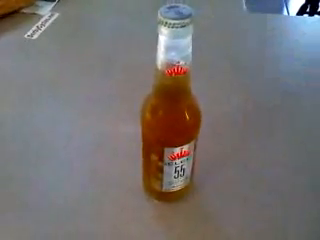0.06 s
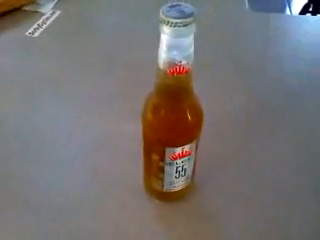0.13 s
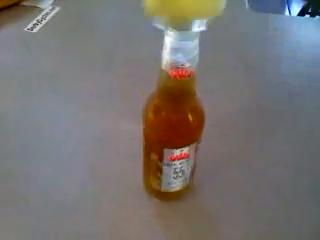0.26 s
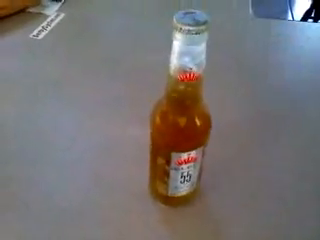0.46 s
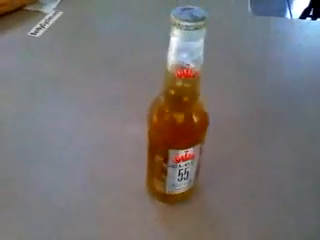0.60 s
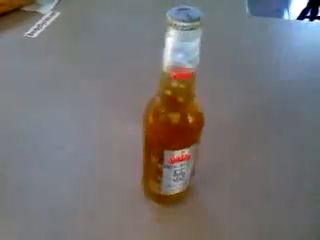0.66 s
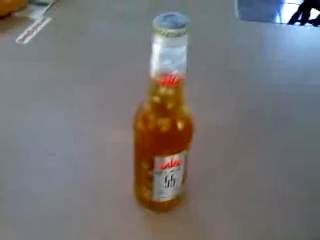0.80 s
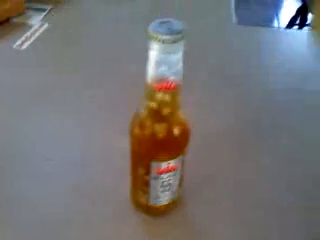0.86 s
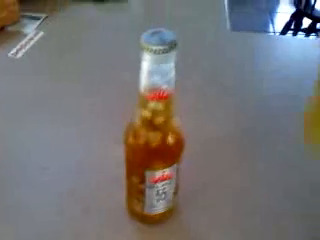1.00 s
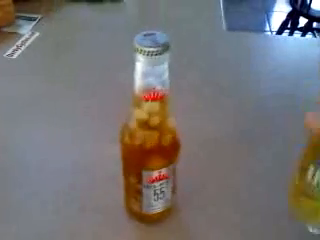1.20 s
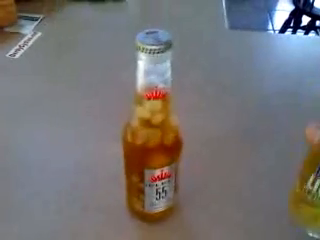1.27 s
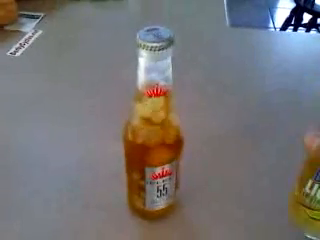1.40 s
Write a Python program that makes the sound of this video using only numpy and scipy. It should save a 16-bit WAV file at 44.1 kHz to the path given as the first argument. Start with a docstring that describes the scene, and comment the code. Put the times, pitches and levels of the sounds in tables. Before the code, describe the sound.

One sharp, rattling knock of glass bottle on bottle, ringing away in a bare room.

```python
"""A bare, echoing room: one glass bottle is knocked on the mouth of a full one standing on a table.
The glass clinks, chatters against the table and rings in its modes. Bubbles torn open in the drink
collapse in a short rattle of damped pings. The room rings on over a faint hum and hiss.
A narrow-band recorder clips the highest peaks; a few sharp ticks reach above its band."""
import sys
import numpy as np
from scipy import signal
from scipy.fft import rfft, irfft
from scipy.io import wavfile
from scipy.ndimage import uniform_filter1d

SR = 44100
rng = np.random.default_rng(int(sys.argv[2]) if len(sys.argv) > 2 else 0)


def unload_wav(signal):
    """Save mono or channel-first audio to the path in sys.argv[1] as 16-bit WAV at rate SR, clipped to [-1, 1]."""
    wavfile.write(
        sys.argv[1],
        SR,
        np.round(np.clip(np.atleast_2d(signal).T, -1, 1) * 32767).astype(np.int16),
    )


N = 63945
TIME_S = np.arange(N) / SR
BINS_HZ = np.fft.rfftfreq(N, 1 / SR)

# Room hum. Each row: centre in Hz, half-width in Hz, level in dB.
HUM_BANDS = [(325, 11, -78), (410, 10, -86)]
# Background noise spectrum. Each row: frequency in Hz, relative level in dB.
FLOOR_SPECTRUM = [(30, -19.5), (120, -13.5), (220, -7), (290, 1), (480, -1.5), (900, -6), (2000, -3),
                  (2800, -3.5), (3400, -1), (3900, -19), (4400, -32)]
# Reverb decay curve, read at band centres. Each row: frequency in Hz, T60 in seconds.
TAIL_DECAY = [(60, 0.58), (160, -0.09), (300, 0.72), (460, 0.53), (780, 0.63), (1200, 0.9051),
              (1900, 0.793), (3000, 0.58), (4200, 0.6753)]
# Reverb colour. Each row: frequency in Hz, relative gain in dB.
TAIL_SPECTRUM = [(60, -3.5), (250, 0), (480, -1), (780, 2.5), (1100, 1), (1800, 0), (2600, 0), (3400, -0.5),
                 (4200, -8)]
# Far-wall echo colour. Each row: frequency in Hz, gain in dB.
ECHO_SPECTRUM = [(100, -14.5), (600, -14), (1080, 0), (1400, -14), (2300, -16), (2900, -20), (3550, -4.5),
                 (4200, -7.5)]
# Bright ticks. Each row: start in seconds, level before filtering in dB.
PEAK_TICKS = [(.2279, -3), (0.2303, -11), (0.2824, -5.5), (0.2952, -36.5)]
# Bubble collapses. Each row: start in seconds, relative level in dB, pitch in Hz.
BUBBLES = [(.2822, -8, 1950), (.2865, -5.5, 1850), (.2915, -6.5, 1800), (.2965, -6.5, 1689),
           (.3025, -5, 1750), (.3065, -9.5, 1700), (.3160, -6.5, 1750), (.3215, -3, 2199),
           (.3275, -3, 1537), (.3413, -9, 1114)]
# Bottle modes. Each row: frequency in Hz, relative level in dB, T60 in seconds.
GLASS_MODES = [(1029, -28, 0.2), (1154, -26.5, 0.84), (1212, -22.5, 0.67), (1562, -23.5, .28),
               (1578, -19, .2), (1656, -24.5, .38), (1760, -29, .4), (1845, -16.5, .54), (2050, -24.5, .2),
               (2192, -22.5, 0.25), (2760, -27.5, 0.16), (2958, -17, 0.47), (3390, -29, .22),
               (3535, -16.5, 0.18)]
# Glass ring swells. Each row: start in seconds, gain in dB, region centre in Hz, extra gain there in dB.
RING_SWELLS = [(.214, 2, 1903, -2.5), (.278, -20, 1850, 25.5), (0.324, -18.5, 1020, 21),
               (0.337, -24.5, 3480, 15)]
# Spectrum of one contact. Each row: frequency in Hz, relative level in dB.
CONTACT_SPECTRUM = [(40, -31.5), (150, -16.5), (400, -12.5), (750, -11.5), (1170, 0.5), (1370, 2.5),
                    (1620, 2.5), (2050, -1), (2500, -0.5), (3000, -6), (3600, -5.5), (4400, -27)]
# Contacts on glass and table. Each row: start in seconds, relative level in dB, bass in dB, treble in dB.
CONTACTS = [(.2070, -7, -1, -3.5), (0.2101, -12, -3, 7.5), (.2150, -7.5, 10.5, -15), (.2205, 0, 1, -2),
            (.2270, -3, 6, -0.5), (.2300, -3, 5, 5), (.2345, -7.5, 1, 5), (.2470, -9.5, 5, 0.5),
            (0.268, -11, -4, 1)]

BAND_EDGE_HZ = 4250


def from_db(db):
    """Decibels to gain."""
    return 10 ** (np.asarray(db) / 20)


def at_hz(points, hz):
    """Table lookup on a log-frequency axis."""
    points = np.array(points)
    return np.interp(np.log(np.maximum(hz, 1)), np.log(points[:, 0]), points[:, 1])


def butter(x, hz, kind, order):
    """Causal Butterworth filter."""
    return signal.sosfilt(signal.butter(order, hz, kind, fs=SR, output="sos"), x + 1e-18)


def damped_sine(hz, t60_s):
    """One decaying mode, unit amplitude."""
    return np.sin(2 * np.pi * hz * TIME_S) * from_db(-60 * TIME_S / t60_s)


def delayed(x, delay_s):
    """Delay, cut to N samples."""
    return np.r_[np.zeros(int(delay_s * SR)), x][:N]


def shaped_noise(gains, rms_db):
    """Steady noise, one gain per frequency bin."""
    noise = irfft(rfft(rng.standard_normal(N)) * gains, N)
    return from_db(rms_db) * noise / noise.std()


def background():
    """Narrow noise bands waver as a low hum under a soft hiss."""
    hum = sum(shaped_noise(1 / (1 + ((BINS_HZ - centre_hz) / half_width_hz) ** 2), db)
              for centre_hz, half_width_hz, db in HUM_BANDS)
    return hum + shaped_noise(from_db(at_hz(FLOOR_SPECTRUM, BINS_HZ)), rms_db=-69)


def reflections(t_s, db, t60_s, build_s=0.0022):
    """Energy envelope of diffuse reflections: fast build-up, exponential decay."""
    shape = ((1 - np.exp(-t_s / build_s)) * from_db(-60 * t_s / t60_s)) ** 2
    return from_db(db) ** 2 * shape / shape.sum()


def room(x, echo_delay_s=0.13, echo_blur_s=0.013):
    """Each band's energy returns as noise: early from table and near walls, a far-wall echo, a tail."""
    white, source = rfft(rng.standard_normal(N)), rfft(x)
    edges_hz = np.r_[0, 150, 300, 500, np.linspace(700, 4700, 17)]
    hop = 15
    t_s = TIME_S[::hop]
    gate = (t_s > CONTACTS[0][0]) & (t_s < t_s[-1] / 2)
    echo_shape = np.exp(-0.5 * ((t_s - echo_delay_s) / echo_blur_s) ** 2)
    out = 0
    for low_hz, high_hz in zip(edges_hz, edges_hz[1:]):
        centre_hz = (low_hz + high_hz) / 2
        band = (BINS_HZ >= low_hz) & (BINS_HZ < high_hz)
        early = reflections(t_s, db=-0.5, t60_s=0.085)
        echo = from_db(at_hz(ECHO_SPECTRUM, centre_hz)) ** 2 * echo_shape / echo_shape.sum()
        tail = reflections(t_s, 5.5 + at_hz(TAIL_SPECTRUM, centre_hz), at_hz(TAIL_DECAY, centre_hz))
        power = uniform_filter1d(irfft(source * band, N) ** 2, hop)[::hop]
        energy = signal.fftconvolve(power * gate, early + echo + tail)[:len(t_s)]
        envelope = np.interp(TIME_S, t_s, np.sqrt(np.maximum(energy, 0)))
        noise = irfft(white * band, N)
        out += envelope * noise / noise.std()
    return delayed(out, delay_s=0.001)


def ticks():
    """Tiny bright ticks on the hardest peaks: gently low-passed impulses."""
    impulses = np.zeros(N)
    for start_s, db in PEAK_TICKS:
        impulses[int(start_s * SR)] = from_db(db)
    return butter(impulses, hz=3200, kind="low", order=1)


def bubble_collapses(pulse, rise_s=0.00045, trim_db=-0.5):
    """Each collapse: a small thud and a ping that the liquid damps at once."""
    rise = 1 - np.exp(-TIME_S / rise_s)
    thud = from_db(-22) * pulse
    return sum(from_db(db + trim_db) * delayed(rise * damped_sine(hz, t60_s=0.016) + thud, start_s)
               for start_s, db, hz in BUBBLES)


def glass_ring(rise_s=0.016, region_width_oct=0.23):
    """The glass ring swells at the blow, then swells again in single pitch regions and dies away."""
    out = 0
    for hz, db, t60_s in GLASS_MODES:
        swell = (1 - np.exp(-TIME_S / rise_s)) * from_db(db - 60 * TIME_S / t60_s)
        energy = 0
        for start_s, swell_db, region_hz, extra_db in RING_SWELLS:
            nearness = np.exp(-0.5 * (np.log2(hz / region_hz) / region_width_oct) ** 2)
            energy += (from_db(swell_db + extra_db * nearness) * delayed(swell, start_s)) ** 2
        out += np.sqrt(energy) * np.sin(2 * np.pi * (hz * TIME_S + rng.random()))
    return out


def contact_pulse(spread_s=0.002):
    """One hard contact. Bending waves in glass disperse: lows arrive after highs."""
    size = 2 * N
    hz = np.fft.rfftfreq(size, 1 / SR)
    cepstrum = irfft(np.log(from_db(at_hz(CONTACT_SPECTRUM, hz))))
    minimum_phase = np.exp(rfft(2 * cepstrum[:N] * (TIME_S > 0), size))
    pulse = butter(irfft(minimum_phase)[:N], BAND_EDGE_HZ, "low", order=4)
    lag_s = spread_s * np.maximum(1 - hz / BAND_EDGE_HZ, 0)
    dispersion = np.exp(-2j * np.pi * np.cumsum(lag_s) * hz[1])
    return irfft(rfft(pulse, size) * dispersion)[:N] / np.abs(pulse).max()


def bottle_knocks(pulse, trim_db=0.5):
    """The blow and the chatter after it: short clacks, each with its own weight and brightness."""
    bass = butter(pulse, hz=670, kind="low", order=1)
    treble = butter(pulse, hz=2440, kind="high", order=1)
    clack = pulse + from_db(-10) * damped_sine(hz=1674, t60_s=0.013)
    out = 0
    for start_s, db, bass_db, treble_db in CONTACTS:
        contact = clack + (from_db(bass_db) - 1) * bass + (from_db(treble_db) - 1) * treble
        out += from_db(db + trim_db) * delayed(contact, start_s)
    return out


def scene():
    """Mono mix; knocks and bubbles feed the room."""
    pulse = contact_pulse()
    knocks, bubbles = bottle_knocks(pulse), bubble_collapses(pulse)
    direct = knocks + bubbles + glass_ring()
    reverb = room(knocks + from_db(-6.5) * bubbles)
    return (direct + reverb + background())[None]


def record(dry, clip_level=0.64, hiss_db=-101.5, cutoff_hz=15900):
    """Recorder: clip, narrow the band, add ticks and faint hiss, cut the top treble."""
    clipped = np.clip(dry, -clip_level, clip_level)
    narrow = signal.sosfilt(signal.cheby1(10, 0.5, BAND_EDGE_HZ, fs=SR, output="sos"), clipped)
    out = narrow + ticks() + from_db(hiss_db) * rng.standard_normal(dry.shape)
    return signal.sosfilt(signal.ellip(10, 0.1, 80, cutoff_hz, fs=SR, output="sos"), out)


dry = scene()
out = record(dry)
unload_wav(out)
```